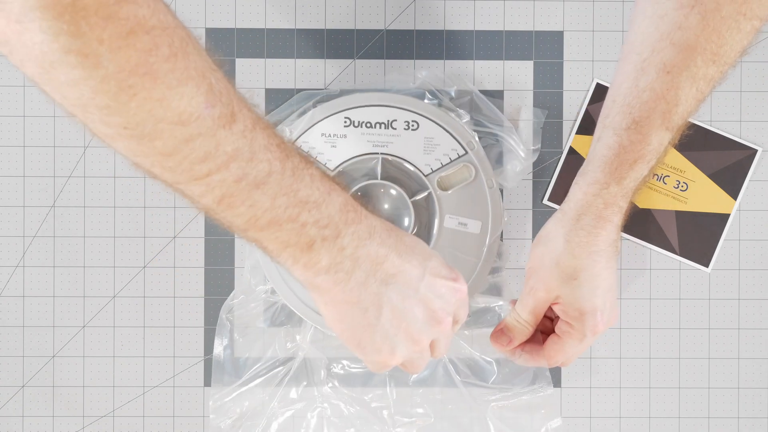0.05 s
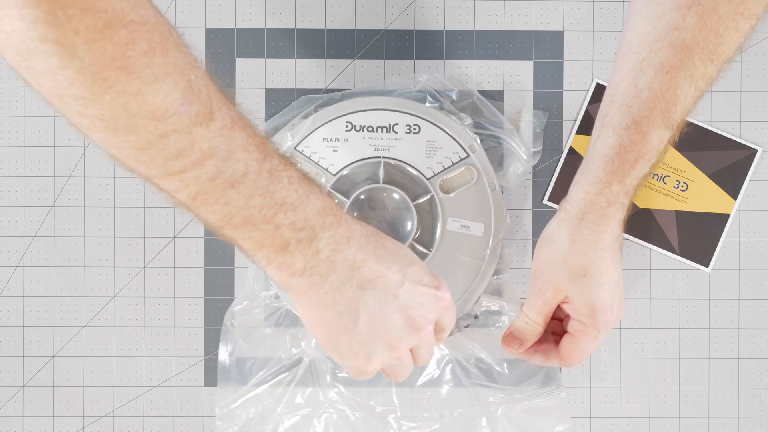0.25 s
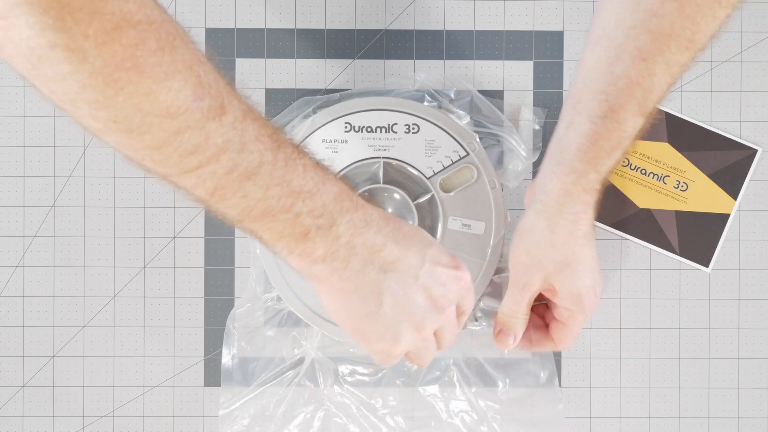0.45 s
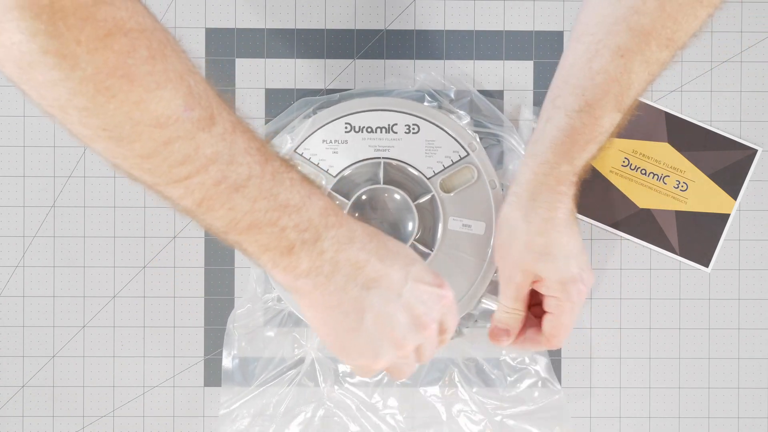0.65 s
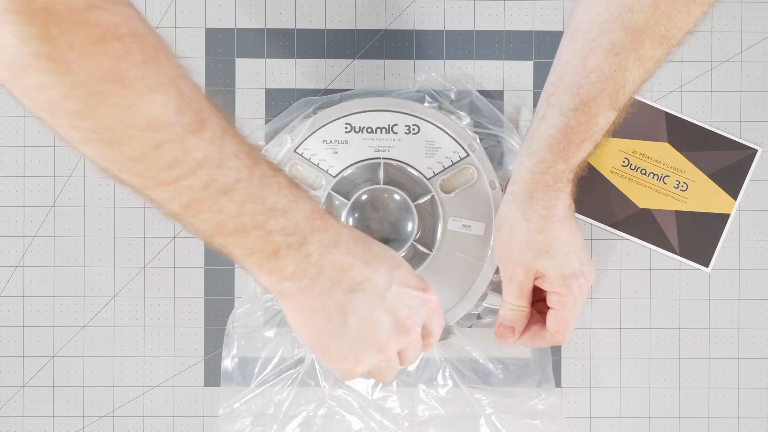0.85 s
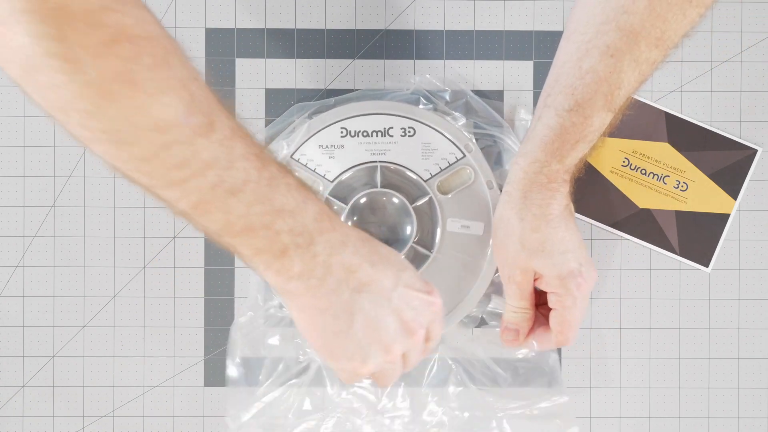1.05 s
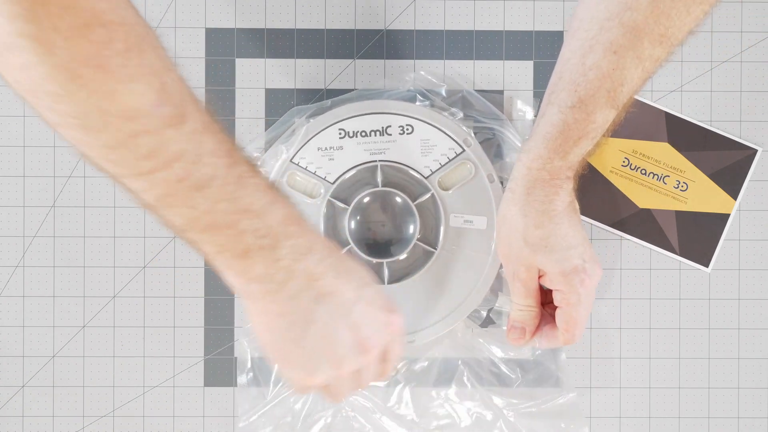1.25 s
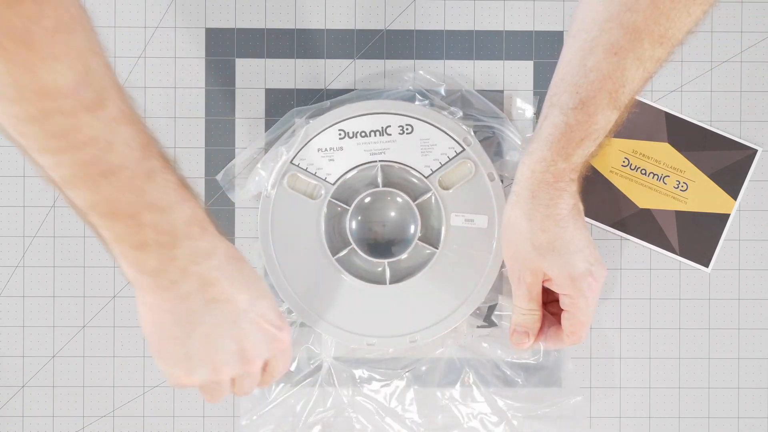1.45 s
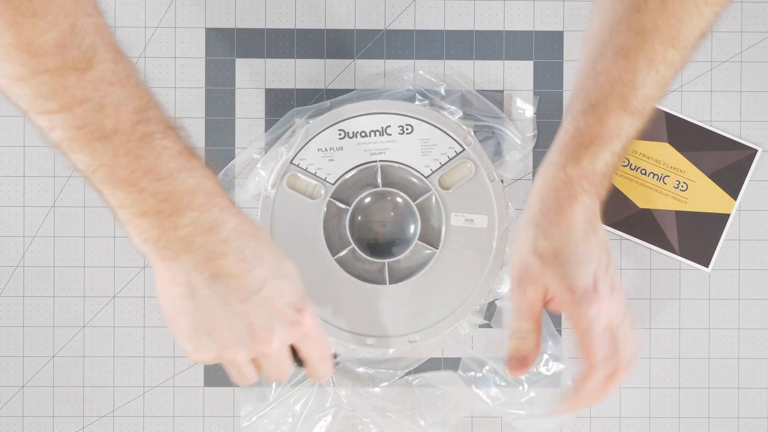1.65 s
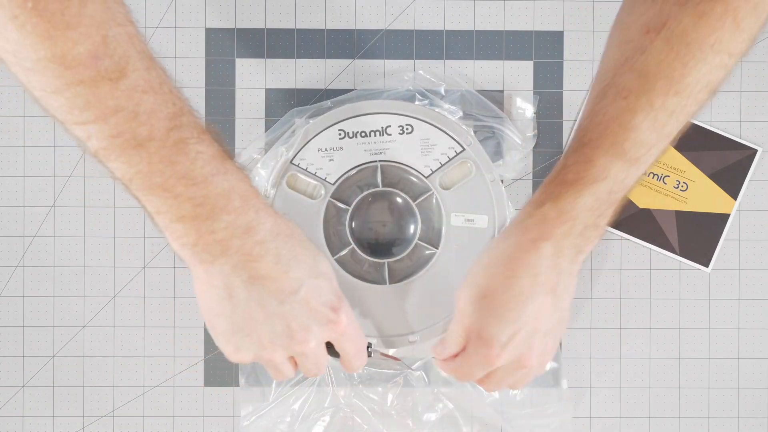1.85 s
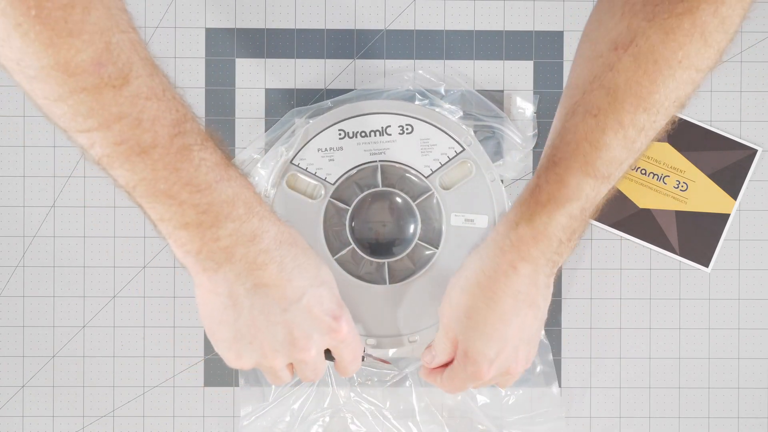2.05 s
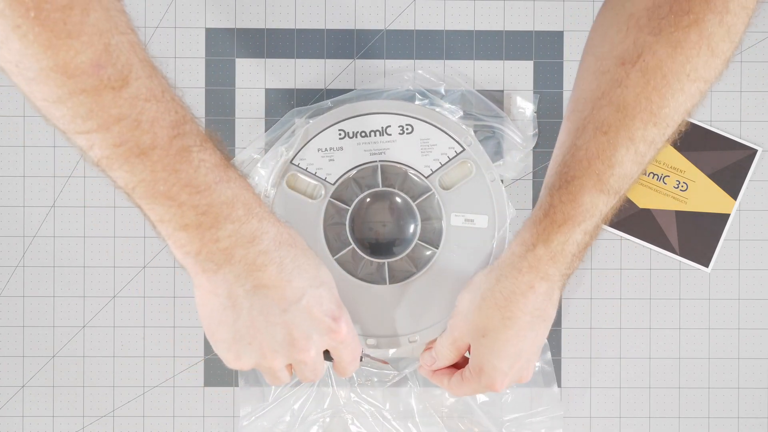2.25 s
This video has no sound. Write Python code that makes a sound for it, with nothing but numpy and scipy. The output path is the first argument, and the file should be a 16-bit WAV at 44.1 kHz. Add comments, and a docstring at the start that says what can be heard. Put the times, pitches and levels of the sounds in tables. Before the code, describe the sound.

Plastic bag film snaps and crackles close by. Dry pops come at once, with a sharp crack and low hand thumps near 0.2 s. Scattered snaps from 0.4 s thicken into dense crinkling around 0.85-1.1 s, with faint airy hiss. More creases lead to a strong pop at 1.42 s. After 1.5 s it is nearly quiet, with small ticks around 1.9 s, fading in a small room.

```python
"""Faint room tone and air hiss, then at once dry snaps and crackle: hands tear a vacuum-sealed plastic
bag stretched over a spool on a table. Snaps and creases are short decaying sines with noisy rips;
bright noise ticks mark where the film parts, low sines are hand thumps, shaped noise is air through
the hole. Film sounds flutter between the table and the surface above it, then die in a small room,
heard by two close microphones."""
import sys
import numpy as np
from scipy import signal
from scipy.fft import rfft, irfft
from scipy.io import wavfile

SR = 44100
rng = np.random.default_rng(int(sys.argv[2]) if len(sys.argv) > 2 else 0)


def int16_out(signal):
    """Quantize to a 16-bit WAV file."""
    q = np.round(np.clip(np.atleast_2d(signal).T, -1, 1) * 32767)
    wavfile.write(sys.argv[1], SR, q.astype(np.int16))


N = 101297  # length in samples

# Steady background spectrum, before its overall level: [f/Hz, density/dB per Hz]
ROOM_TONE_SPECTRUM = [(18, -16), (40, 0), (70, 0.5), (108, 6), (193, -3), (381, -3), (447, -6), (695, -7.5),
                      (1640, -6.5), (2090, -14.5), (3000, -10), (3900, -68)]
# Colour of the air hiss, before its overall level: [f/Hz, density/dB per Hz]
AIR_SPECTRUM = [(600, -52), (1200, -6), (2200, -10), (4000, -2), (5800, 1), (6900, 2), (8500, 1),
                (12000, 0), (15000, -3.5), (16000, -25)]
# Air flow through the hole, before the hiss trim and flicker: [t/s, level/dB]
AIR_FLOW = [(0, -79.5), (.17, -75.5), (.33, -72.5), (.4, -60.5), (.5, -60), (.54, -67.5), (.68, -74.5),
            (.69, -59.5), (.86, -59.5), (1.1, -55), (1.24, -59), (1.45, -58), (1.6, -61), (1.82, -64.5),
            (1.85, -60), (1.905, -64.5), (1.94, -54.5), (1.99, -65.5), (2.1, -68), (2.3, -70.5)]
# Pull on the film, driving small creases, before their trim: [t/s, level/dB, brightness/dB]
FILM_PULL = [(0, -63, -3.5), (.3, -67, -5.5), (.42, -56, -12.5), (.56, -65, -8.5), (.68, -54, -11.5),
             (.84, -53.5, -2.5), (.885, -49, -6.5), (.93, -57, -6), (.965, -40.5, -12.5), (1.02, -59, 3),
             (1.04, -46.5, -4.5), (1.1, -48, -5), (1.16, -55.5, -3), (1.25, -64, -13), (1.29, -47, -7.5),
             (1.37, -52.5, -15), (1.4, -60, -11), (1.435, -46.5, -5), (1.5, -57.5, -9.5), (1.64, -69.5, -1),
             (1.82, -81, 1), (1.85, -62.5, 0), (1.9, -69.5, 0), (1.94, -63, 6.5), (2.0, -69.5, 1.5),
             (2.3, -78.5, 3)]
# Hand thumps through the table: [t/s, level/dB, final f/Hz]
HAND_THUMPS = [(.005, -64, 70), (0.049, -56.5, 98), (.12, -59, 72), (0.187, -43.5, 157.6),
               (0.185, -52.5, 72), (.222, -55, 189), (0.25, -57.5, 74.4), (.8, -64, 70), (0.952, -57, 152),
               (1.0, -64, 152), (1.28, -59, 159), (1.351, -55, 159), (1.418, -55, 171)]
# Film snaps; ring and thud levels are relative to the dull body, whose rise is given in cycles:
# [t/s, level/dB, dull f/Hz, ring f/Hz, ring level/dB, thud level/dB, dull rise/cycles]
FILM_SNAPS = [(0.0169, -33, 1690, 3050, 1, -22, 1.06), (0.0187, -30.5, 740, 2880, -22, -14, 0.49),
              (0.036, -36, 950, 3260, -17, -37, 0.86), (0.186, -30.5, 980, 2350, -11.5, -26, 0.42),
              (0.189, -25, 974, 2270, -12, -20, 0.49), (0.252, -38, 950, 2890, -5, -6, 0.6),
              (0.330, -53, 970, 3830, 7, -26, 0.62), (0.350, -45.5, 1040, 2420, -7.5, -13, 1.3),
              (0.389, -31, 1460, 2400, -14, -41, 0.7), (0.415, -28, 890, 3070, -13, -47, 0.8),
              (0.468, -47, 880, 3340, -15, -31, 1), (0.4855, -39, 775, 3170, -16, -13, 0.71),
              (0.504, -46, 835, 2900, 4.5, -33, 0.6), (0.526, -39.5, 820, 2540, -25, -20, 0.85),
              (0.583, -31.5, 834, 2380, -14.5, -36, 0.91), (0.627, -32.5, 1260, 2900, -20, -34, 0.44),
              (0.637, -28.5, 806, 2700, -22.5, -46, 0.82), (0.679, -43, 960, 2620, -7, -30, 0.91),
              (0.689, -43.5, 990, 2990, 5.5, -30, 0.85), (0.729, -38, 710, 3500, -9.5, -16, 0.82),
              (0.755, -42, 890, 3160, 7, -20, 0.51), (0.781, -47, 564, 3130, 7, -21, 0.64),
              (0.791, -35.5, 970, 3180, -11, -36, 0.67), (0.804, -39, 990, 3570, -5, -29, 1.3),
              (0.865, -28, 750, 2060, -5.5, -19, 0.57), (0.873, -25, 1290, 2020, -18, -10, 0.66),
              (0.920, -40.5, 770, 2850, -0.5, -28, 1.1), (0.946, -22, 1020, 3300, -9, -13.5, 0.58),
              (0.964, -32, 744, 2740, -6, -12, 1.1), (0.9846, -27, 856, 2790, -3.5, -38, 0.71),
              (0.995, -34, 980, 2680, -3, -36, 0.73), (1.029, -31, 900, 2780, -4, -24, 1.1),
              (1.035, -32, 984, 3860, 0, -35, 0.91), (1.04, -38, 890, 2770, 3.5, -35, 0.61),
              (1.059, -34.5, 820, 2350, -7, -24, 0.47), (1.068, -30.5, 1280, 2800, -2.5, -27, 1.3),
              (1.078, -33, 1380, 2980, -4, -32, 0.49), (1.087, -31.5, 1180, 2930, -6, -41, 1.2),
              (1.092, -38, 1000, 3520, 2, -29, 1.1), (1.1711, -34, 1470, 3200, 4, -10.5, 0.9),
              (1.193, -31.5, 720, 2770, -13.5, -14, 0.39), (1.269, -32.5, 1140, 3180, -12.5, -10.5, 0.78),
              (1.295, -36.5, 820, 3400, -14, -23, 0.48), (1.304, -30.5, 1060, 3300, -12, -17, 0.24),
              (1.335, -40, 1220, 2370, -26, -4, 3.2), (1.354, -34, 1250, 2380, -6, -10, 1.7),
              (1.369, -37, 1225, 2300, -7, -29, 2.5), (1.403, -32, 1310, 2370, -14, -33, 0.47),
              (1.406, -27.5, 1200, 2420, -13, -35, 0.37), (1.415, -30, 860, 3700, -6.5, -12.5, 0.47),
              (1.424, -18.5, 1096, 2480, -14, -14.5, 0.5), (1.456, -38, 1000, 2470, -15, -3, 0.46),
              (1.525, -40, 986, 2870, -17, -23, 0.94), (1.836, -51.5, 1800, 3530, -8, -27, 0.97),
              (1.860, -52, 850, 3050, -12, -22, 1.2), (1.873, -40, 1050, 3900, -13, -43, 0.85),
              (1.914, -34, 1480, 2750, -18, -37, 0.58), (1.923, -39, 1000, 3300, -3, -30, 0.79),
              (1.935, -48, 1770, 3330, -12, -28, 2), (1.949, -42.5, 1800, 2230, -10, -35, 2.3),
              (1.963, -41, 1890, 3820, -8, -39, 1.4), (1.997, -45, 1260, 2900, -19, -36, 0.76),
              (2.073, -47, 1060, 3470, -1, -9.5, 1.1), (2.13, -52.5, 1850, 2150, -11, -24, 2.4),
              (2.141, -59, 1880, 3980, -22, -29, 1.1), (2.186, -51, 1560, 2800, 1.5, -4, 0.72),
              (2.199, -52, 1250, 2360, -7, -9, 1), (2.282, -53.5, 1680, 3560, -7, -13, 0.99)]
# Bright cracks, before filtering: [t/s, tick level/dB, puff level/dB]
FILM_CRACKS = [(.0172, -26.5, -42.5), (.1861, -20.5, -41.5), (.689, -50, -59), (0.753, -46, -55),
               (.866, -46, -47), (1.172, -46, -61)]

ROOM_TONE_DB, ROOM_TONE_SIDE_DB = -68, -1.5  # side is relative to mid
AIR_TRIM_DB, AIR_FLICKER_DB, AIR_FLICKER_HZ = 6.5, 0.6, 27.0
AIR_ALIKE = 0.35  # share of hiss power common to both microphones

CREASES_PER_S = 900  # typical rate, before clumping
CREASE_TRIM_DB, CREASE_SPREAD_DB = -3, 3.5
CREASE_THUD_DB, CREASE_CYCLES = -29, 1
CREASE_LOW_HZ, CREASE_HIGH_HZ = 547.5, 1850
RING_LOW_HZ, RING_HIGH_HZ = 2235, 4340
GRIT_DB, GRIT_BAND_HZ = 13.5, [3600, 9500]

THUMP_CYCLES, THUMP_START = 1.2, 1.12  # rise in cycles; start pitch over final pitch

RING_CYCLES = 1.32  # rise in cycles
THUD_HZ, THUD_S = 512, 0.0011
RIP_DB, RIP_S, RIP_HALF_WIDTH_HZ = 0.5, 0.00091, 1530
FILM_LOW_HZ = 324

CRACK_S, CRACK_LOW_HZ = 0.0003, 10500
PUFF_S, PUFF_BAND_HZ = 0.024, [1300, 9000]
TICK_TAIL_DB = -14  # tick send to the room

FLUTTER_S, FLUTTER_DB, FLUTTER_CUT_HZ = 0.0081, -7.5, 4500  # per round
ROOM_DB, ROOM_T60_S, TREBLE_T60_S = -4, 0.17, 0.18
ROOM_SPLIT_HZ, ROOM_SIDE_HZ, ROOM_ONSET_S = 2500, 3570, 0.001
LEFT_LEADS_S = 0.00003
STOPBAND_HZ = 16700


def from_db(db):
    """Gain of a level in dB."""
    return 10 ** (np.asarray(db) / 20)


def rms_one(x):
    """Scale to rms 1."""
    return x / np.sqrt(np.mean(x ** 2) + 1e-20)


def in_time(rows):
    """Columns of a curve table, interpolated per sample."""
    s, *columns = np.transpose(rows)
    return [np.interp(np.arange(N) / SR, s, column) for column in columns]


def drift(rate):
    """Random wobble of rms 1: noise through two equal lowpass poles at rate Hz."""
    r = np.exp(-2 * np.pi * rate / SR)
    noise = rng.standard_normal(N + SR)
    smooth = signal.lfilter([1], [1, -2 * r, r * r], noise)
    return rms_one(smooth[SR:])  # skip the filter's start-up


def coloured(spectrum, channels):
    """Independent noise channels with a given spectrum, overall rms 1."""
    hz, db = np.transpose(spectrum)
    f = np.arange(N // 2 + 1) * SR / N + 1  # 1 Hz offset avoids log of zero
    gain = from_db(np.interp(np.log(f), np.log(hz), db, left=-70))
    white = rng.standard_normal((channels, N))
    return rms_one(irfft(rfft(white) * gain, N))


def band(x, hz, kind, order=2):
    """Butterworth filter."""
    return signal.sosfilt(signal.butter(order, hz, kind, fs=SR, output="sos"), x)


def place(s, shapes):
    """Add each row of shapes at its time."""
    out = np.zeros(N + SR)
    starts = (s[:, None] * SR).astype(int)
    np.add.at(out, starts + np.arange(shapes.shape[1]), shapes)
    return out[:N]


def swell(t, tau):
    """Quick rise to 1 at tau, then a fall."""
    return t / tau * np.exp(1 - t / tau)


def microphones(x):
    """Stereo pair: the left capsule hears the source a little earlier than the right."""
    n = np.arange(N)
    right = np.interp(n - LEFT_LEADS_S * SR, n, x)
    return np.array([x, right])


def room_tone():
    """Steady coloured noise, with independent mid and side."""
    mid, side = coloured(ROOM_TONE_SPECTRUM, channels=2)
    return from_db(ROOM_TONE_DB) * (mid + from_db(ROOM_TONE_SIDE_DB) * side * [[1], [-1]])


def air():
    """Air hissing through the hole: flickering noise, partly direct and partly diffuse."""
    direct, *diffuse = coloured(AIR_SPECTRUM, channels=3)
    hiss = np.sqrt(AIR_ALIKE) * microphones(direct) + np.sqrt(1 - AIR_ALIKE) * np.array(diffuse)
    flow_db = in_time(AIR_FLOW)[0]
    flicker_db = AIR_FLICKER_DB * drift(AIR_FLICKER_HZ)
    return hiss * from_db(flow_db + AIR_TRIM_DB + flicker_db)


def creases():
    """Small random snaps in clumps, stronger with the pull, each with a gritty click."""
    level_db, bright_db = in_time(FILM_PULL)
    chance_per_sample = CREASES_PER_S * from_db(3 * drift(25)) / SR
    born = np.flatnonzero(rng.random(N) < chance_per_sample)
    s, bright_db = born / SR, bright_db[born]
    size = rng.exponential(1, len(born))
    pitch, ring = rng.random((2, len(born)))
    db = level_db[born] + CREASE_TRIM_DB + CREASE_SPREAD_DB * np.minimum(size, 3)
    hz = CREASE_LOW_HZ * (CREASE_HIGH_HZ / CREASE_LOW_HZ) ** pitch
    ring_hz = RING_LOW_HZ * (RING_HIGH_HZ / RING_LOW_HZ) ** ring
    clicks = place(s, from_db(db + bright_db + GRIT_DB)[:, None])
    grit = band(clicks, GRIT_BAND_HZ, "band")
    thud_db = np.full(len(born), CREASE_THUD_DB)
    cycles = np.full(len(born), CREASE_CYCLES)
    return grit + snap(s, db, hz, ring_hz, bright_db, thud_db, cycles)


def thumps():
    """Low knocks of the hands on the table: swelling sines that sag in pitch."""
    s, db, hz = np.transpose(HAND_THUMPS)[:, :, None]
    t = np.arange(9000) / SR
    tau = THUMP_CYCLES / hz
    turns = hz * (t + (THUMP_START - 1) * tau * (1 - np.exp(-t / tau)))  # integrated pitch
    return place(s[:, 0], from_db(db) * swell(t, tau) * np.sin(2 * np.pi * turns))


def snap(s, db, hz, ring_hz, ring_db, thud_db, cycles):
    """A crease flips: dull cycles, a low thud, a short higher ring and a noisy rip around it."""
    t = np.arange(500) / SR
    chance = rng.random((len(s), 2 + len(t)))
    body_phase, ring_phase = chance[:, :1], chance[:, 1:2]
    noise = 4 * chance[:, 2:] - 2
    columns = (db, hz, ring_hz, ring_db, thud_db, cycles)
    db, hz, ring_hz, ring_db, thud_db, cycles = (v[:, None] for v in columns)
    body = swell(t, np.maximum(cycles, .3) / hz) * np.sin(2 * np.pi * (hz * t + body_phase))
    thud = from_db(thud_db) * swell(t, THUD_S) * np.sin(2 * np.pi * THUD_HZ * t)
    ring = swell(t, RING_CYCLES / ring_hz) * np.sin(2 * np.pi * (ring_hz * t + ring_phase))
    # low noise shifted up to sit around the ring's pitch
    rip_noise = band(noise, RIP_HALF_WIDTH_HZ, "low") * 2 * np.cos(2 * np.pi * ring_hz * t)
    rip = from_db(RIP_DB) * swell(t, RIP_S) * rip_noise
    return place(s, from_db(db) * (body + thud + from_db(ring_db) * (ring + rip)))


def cracks():
    """Very short bright ticks where the film parts, each with a fading puff of noise."""
    s, db, puff_db = np.transpose(FILM_CRACKS)[:, :, None]
    t = np.arange(5000) / SR
    noise = rng.choice([-1, 1], (len(s), len(t)))
    ticks = place(s[:, 0], from_db(db) * noise * np.exp(-t / CRACK_S))
    puffs = place(s[:, 0], from_db(puff_db) * noise * np.exp(-t / PUFF_S))
    return band(ticks, CRACK_LOW_HZ, "high", order=4), band(puffs, PUFF_BAND_HZ, "band", order=1)


def flutter(x):
    """Source plus repeats between two facing surfaces, softer and duller each round."""
    f = np.arange(N + 1) * SR / (2 * N)
    delay = np.exp(-2j * np.pi * f * FLUTTER_S)
    loop = from_db(FLUTTER_DB) / (1 + 1j * f / FLUTTER_CUT_HZ) * delay
    return irfft(rfft(x, 2 * N) / (1 - loop))[:N]


def room(x):
    """Dying noise tail; alike left and right in the bass, different in the treble."""
    t = np.arange(SR // 2) / SR
    white = rng.standard_normal((2, len(t)))
    low = band(white, ROOM_SPLIT_HZ, "low", order=1)
    low_tail = low * from_db(-60 * t / ROOM_T60_S)
    treble_tail = (white - low) * from_db(-60 * t / TREBLE_T60_S)
    mid, side = low_tail + treble_tail
    side = band(side, ROOM_SIDE_HZ, "high", order=1)
    tail = np.array([mid + side, mid - side]) * (1 - np.exp(-t / ROOM_ONSET_S))
    tail = tail / np.sqrt(np.sum(mid ** 2))
    return from_db(ROOM_DB) * signal.fftconvolve(x[None], tail, axes=1)[:, :N]


def scene():
    """Film, hands, air and room tone; snaps and creases reach the room from different spots."""
    film = np.array([snap(*np.transpose(FILM_SNAPS)), creases()])
    snaps, small = band(film, FILM_LOW_HZ, "high")
    ticks, puffs = cracks()
    direct = flutter(snaps + small + puffs) + thumps()
    # each call draws its own tail
    tails = room(snaps) + room(small + puffs + from_db(TICK_TAIL_DB) * ticks)
    return microphones(direct) + ticks + tails + air() + room_tone()


def record(dry):
    """A steep lowpass cuts the top, 60 dB down from the stopband edge."""
    return signal.sosfilt(signal.cheby2(12, 60, STOPBAND_HZ, fs=SR, output="sos"), dry)


dry = scene()
out = record(dry)
int16_out(out)
```